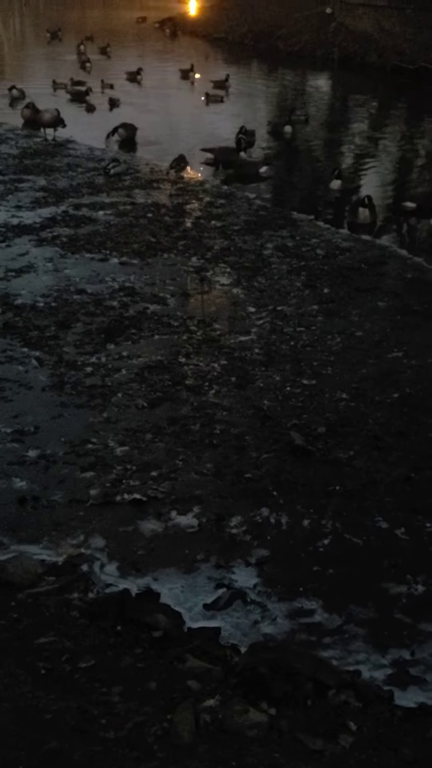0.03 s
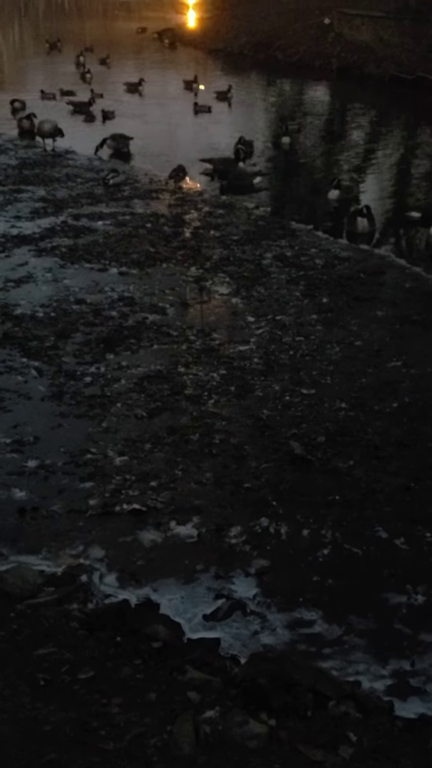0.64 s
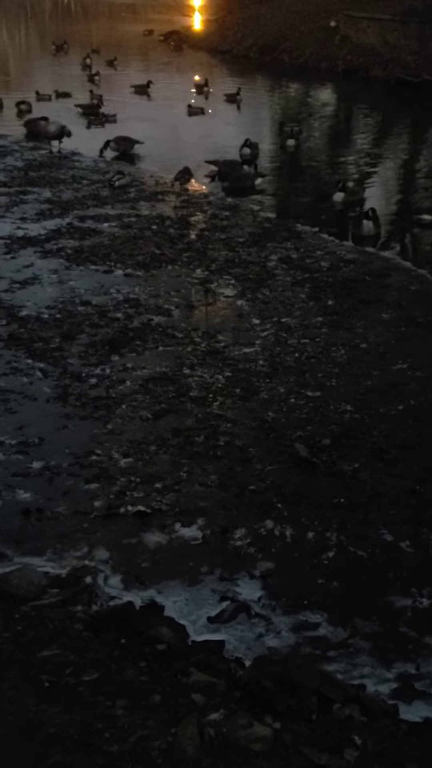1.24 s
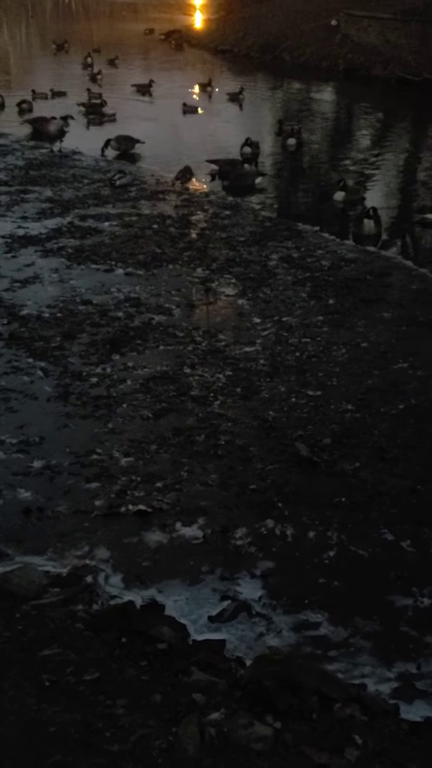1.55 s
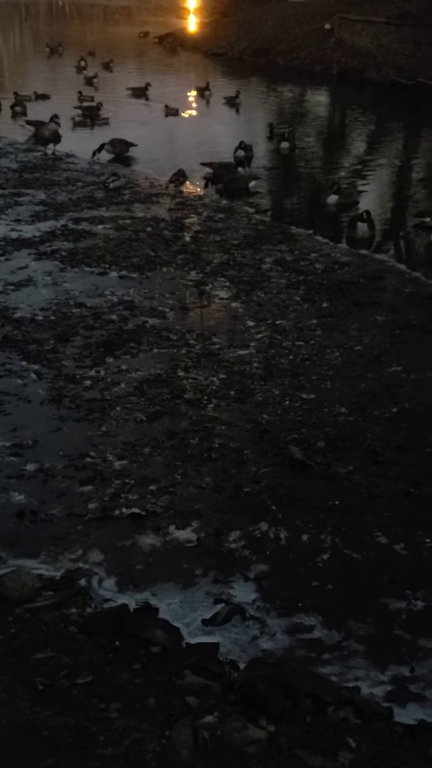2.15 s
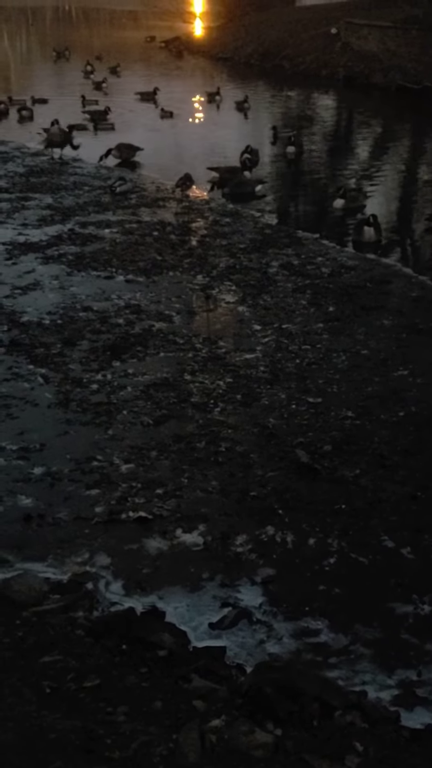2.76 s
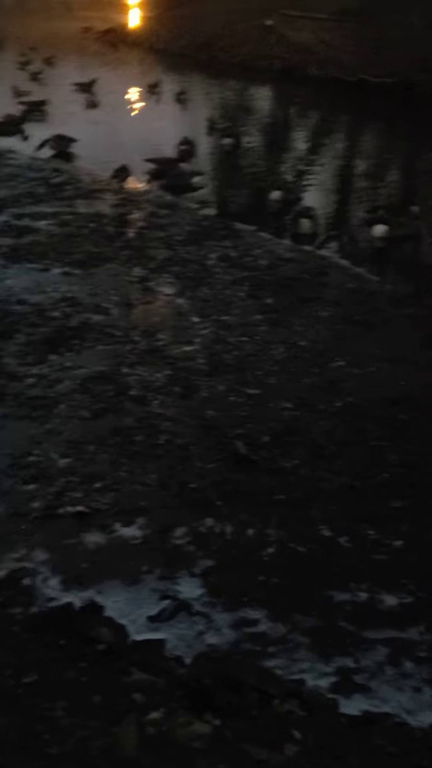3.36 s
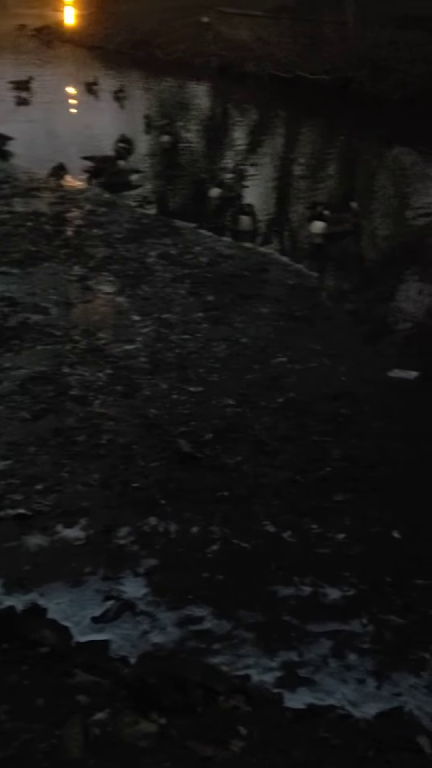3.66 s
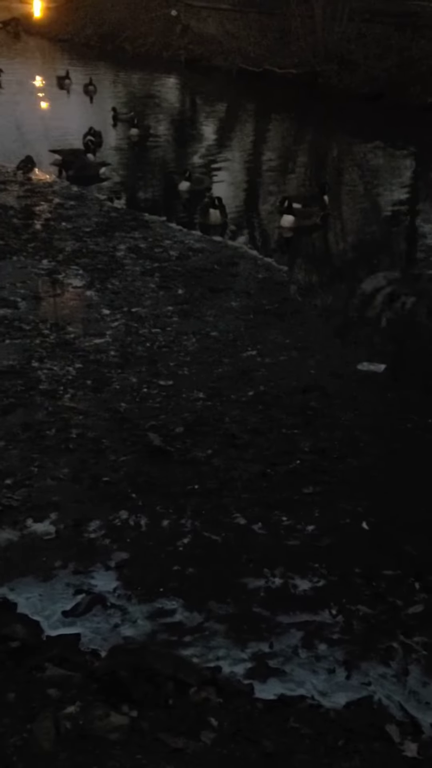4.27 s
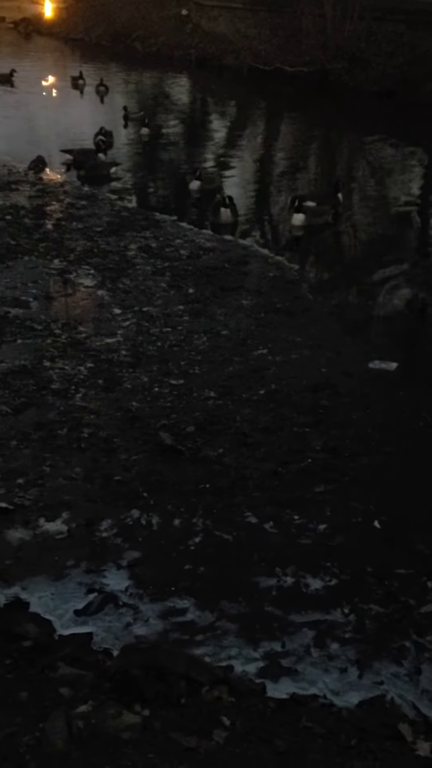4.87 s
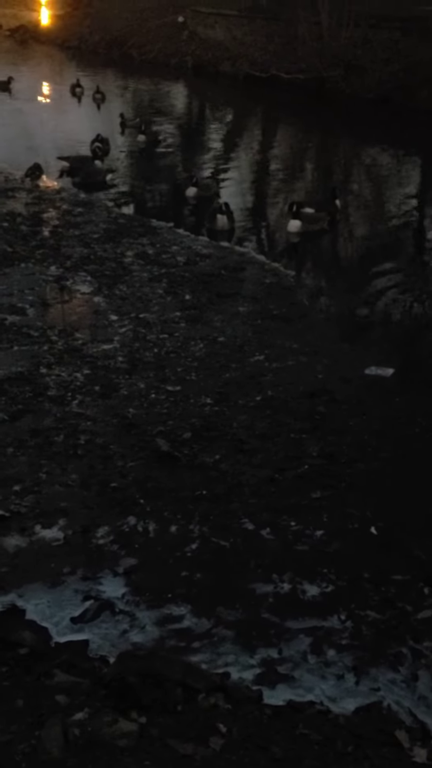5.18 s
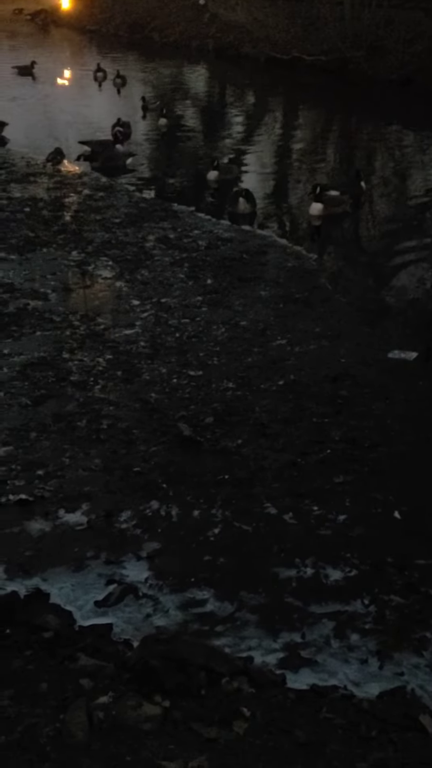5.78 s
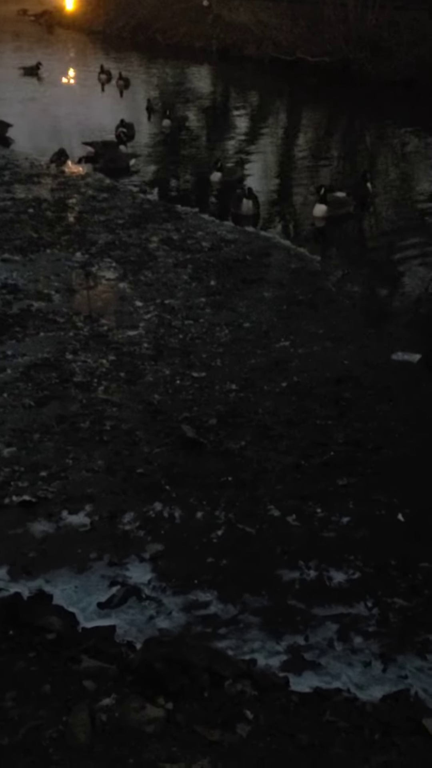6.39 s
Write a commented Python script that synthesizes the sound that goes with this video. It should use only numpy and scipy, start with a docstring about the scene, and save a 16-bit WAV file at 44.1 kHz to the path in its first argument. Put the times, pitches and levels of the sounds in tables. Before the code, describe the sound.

A low rumble of distant traffic runs throughout, heard from the shore of a half-frozen pond, with a faint whine coming and going between about 2 and 4.5 seconds. A small bird gives one faint, high chirp at the start. Waterfowl peck at ice and water in scattered short, dull taps, over a faint wet fizz of dabbling that slowly grows. Thin, distant peeps come between 1 and 4 seconds. A duck gives three soft, rattling rasps at about 1.8, 2.5 and 3.5 seconds. From 4.5 seconds to the end at about 6.5, it gives seven loud, harsh, close quacks, roughly three a second, each rising and falling in pitch, the run sinking slightly lower. These are by far the loudest sounds and echo faintly off the banks. A sleeve lightly brushes the microphone a few times, most noticeably near 3 seconds.

```python
"""Dusk at a half-frozen pond

Heard from the shore, a duck gives three soft rattling rasps, then seven loud, harsh quacks: air pulses
ringing its throat. Other waterfowl dabble and peck; farther off they peep, and a small bird chirps once.
Distant traffic rumbles with a faint whine, a sleeve brushes the microphone, the banks answer faintly."""
import sys
import numpy as np
from scipy import signal
from scipy.fft import rfft, irfft, next_fast_len
from scipy.io import wavfile
from scipy.ndimage import uniform_filter1d, map_coordinates

SR = 44100
rng = np.random.default_rng(int(sys.argv[2]) if len(sys.argv) > 2 else 0)


def transcribe(u):
    """Save the signal u as a 16-bit wav file named by the first command-line argument.

    u: samples, shape (n,) or (channels, n), limited to [-1, 1]; the rate is SR.
    q: integer samples, one column per channel.
    """
    v = np.clip(np.atleast_2d(u).T, -1, 1)
    q = np.round(v * 32767).astype(np.int16)
    wavfile.write(sys.argv[1], SR, q)


N = 287532

# Background across the microphone pair. Each row: frequency in Hz, left-right correlation.
STEREO_LIKENESS = [(60, 0.99), (130, 0.99), (290, 0.97), (640, 0.81), (1410, 0.35), (3100, 0.13),
                   (6820, 0.077), (15000, 0.18)]
# Distant roads. Each row: time in seconds, rumble level in dB, relative level of the town's wash in dB.
TRAFFIC_LEVELS = [(0, -41.5, -53.5), (.9, -42, -51.5), (1.7, -42, -52.5), (2.7, -40.5, -50.5),
                  (4.3, -42, -51), (5.6, -46, -56), (6.52, -45.5, -53)]
# Noise colours. Each row: frequency in Hz, relative spectral density in dB.
RUMBLE_SPECTRUM = [(13, -57), (22, -32.5), (29, -40), (37, -29.5), (48, 0), (64, -2), (109, -3.5),
                   (139, -9.5), (303, -24), (376, -33), (400, -28.5), (520, -28), (880, -120)]
TOWN_SPECTRUM = [(120, -11.5), (200, -5.5), (377, -9.5), (637, -14), (759, -12.5), (868, -12.5),
                 (1080, -18.5), (1850, -22.5), (5000, -50.5), (6500, -111.5), (11000, -120)]
DABBLE_SPECTRUM = [(710, -3.5), (1200, -1.5), (1370, -2.5), (1980, -4.5), (2160, -4.5), (3530, -18),
                   (4280, -12), (5090, -17), (5770, -11.5), (8160, -19.5), (9340, -36.5), (12000, -41),
                   (15600, -69), (22000, -120)]
SLEEVE_SPECTRUM = [(1500, -1), (4000, -6), (7000, -6), (9500, -10), (12500, -6), (15500, -7.5)]
BILL_HISS_SPECTRUM = [(1500, -6), (2700, -5), (3500, -7), (4300, 5), (5000, 2.5), (6100, 11), (7200, 2),
                      (8400, -8.5), (9400, -1.5), (10500, -9.5), (12500, -8.5), (15500, -15.5)]
# Dabbling, and the hiss under the sleeve. Each row: time in seconds, relative level in dB.
DABBLE_LEVELS = [(.4, -83.5), (.65, -72), (1.15, -70.5), (1.7, -81), (2.5, -68.5), (3.1, -68), (6.5, -62)]
HISS_LEVELS = [(0, -89), (2.1, -87.5), (6.5, -82.5)]
# Far birds. Each row: start and length in seconds, first, middle and last pitch in Hz, relative dB.
FAR_CALLS = [(.09, .15, 9400, 8650, 9300, -71), (.09, .15, 8300, 7600, 8400, -75),
             (1.08, .06, 950, 1080, 1350, -55), (1.93, .06, 820, 950, 1200, -57),
             (3.03, .08, 980, 1080, 1020, -57), (3.225, .025, 1300, 1750, 2200, -48),
             (3.23, .09, 1170, 1190, 1090, -56), (3.39, .13, 1160, 1280, 1090, -54.5),
             (4.08, .04, 1120, 1080, 1030, -55)]
# Sleeve strokes and spells of traffic whine. Each row: start and length in seconds, relative dB.
SLEEVE_STROKES = [(0.54, 0.96, -87), (2.294, 0.11, -77.5), (2.936, 0.19, -66.5), (3.415, 0.65, -80),
                  (5.95, 0.61, -75.5)]
WHINE_SPELLS = [(1.803, 0.87, -61.5), (3.1, .6, -64.5), (4.2, 0.34, -61)]
# Bills on ice and water. Each row: start in seconds, relative level in dB, crisp edge against that in dB.
PECKS = [(0.655, -48, -12), (.986, -40, -29), (2.17, -52, -19), (2.3495, -42, -23), (3.307, -44.5, -15),
         (3.5024, -58, 1), (3.935, -47.5, -22), (4.236, -62, 12.5), (5.06, -41.5, -13), (6.0832, -47, 1)]
# Resonances of a peck and of the duck's throat. Each row: frequency in Hz, gain in dB.
PECK_BODY = [(300, -27.5), (1400, 8.5), (3000, -2.5), (4400, -2), (6500, -7.5), (9000, -19.5),
             (15000, -27.5)]
RASPING_THROAT = [(900, -21), (1450, -11), (1750, 8.5), (2150, 9), (2500, -1.5), (2900, 4), (3600, -31),
                  (6000, -17), (9000, -53)]
QUACKING_THROAT = [(250, -58.5), (450, -47), (680, -25.5), (850, -40), (1080, -21), (1400, -19.5),
                   (1650, -15.5), (1900, -1.5), (2120, -3), (2400, -16), (2900, -27), (3600, -41),
                   (6000, -54), (12000, -64)]
# The duck's rasps. Each row: start and length in seconds, relative level at the end in dB.
RASP_CALLS = [(1.763, .21, -58), (2.536, 0.2, -51.5), (3.507, 0.19, -51)]
# The duck at the microphone's two ports. Each row: frequency in Hz, left over right in dB.
PORT_BALANCE = [(500, 0), (800, -0.5), (1200, 6), (1700, -9), (2150, -8), (2700, -3.5), (4200, 1),
                (15000, -2)]
# Its earlier arrival on the left. Each row: frequency in Hz, lead in seconds.
LEFT_LEAD = [(860, 0.00026), (1400, 0.00064), (2600, 0.000553), (6000, 0.000504)]
# The quacks. Each row: start, length and time to the top of the pitch arch in seconds; first, top and
# last pitch in Hz; flatness of the arch; relative level and fade after the top in dB; clearness at
# the top and weakening of every second pulse, both 0-1; throat resonance in Hz.
QUACK_CALLS = [(4.48, 0.19, 0.11, 392.5, 462.8, 399.2, 2.71, -28.5, 1, 0.3, 0.78, 1927),
               (4.768, 0.22, 0.095, 348.1, 470.8, 314.1, 2.37, -26.5, 7.5, 0.67, 0.42, 1843),
               (5.095, .223, .081, 320.8, 457.5, 301.8, 1.65, -26.5, 6.5, 0.64, 0, 1837),
               (5.436, 0.22, .08, 287.2, 445.3, 321.5, 1.4, -28.5, 6, 0.48, 0, 1848),
               (5.784, .212, .085, 317, 420.3, 312, 1.35, -29.5, 4.5, 0.02, 0, 1848),
               (6.125, 0.18, 0.1, 330.9, 393.7, 295.1, 2.46, -29.5, 3, .1, 0.58, 1846),
               (6.437, 0.22, 0.098, 254.2, 388, 329.4, 2.58, -29, 1, 0.5, 0.9, 1810)]
# How strongly a quack's clean low harmonics radiate. Each row: frequency in Hz, gain in dB.
LOW_HARMONICS = [(300, -51.5), (390, -43.5), (460, -41), (600, -42), (780, -41.5), (930, -40.5),
                 (1150, -48), (1400, -53.5)]
# Echo from the wooded banks. Each row: frequency in Hz, time to fall 60 dB in seconds.
BANK_DECAY = [(300, 0.53), (2000, 0.52), (10000, 1)]


def amp(db):
    """Decibels to gain."""
    return 10 ** (np.asarray(db) / 20)


def unit(x):
    """Scale to rms 1."""
    return x / np.sqrt(np.mean(x ** 2) + 1e-20)


def along(points, hz):
    """Read (Hz, value) points on a log frequency axis."""
    f, v = np.transpose(points)
    return np.interp(np.log(hz + 1), np.log(f + 1), v)


def curves(rows):
    """One value per sample for each column after the time."""
    s, *cols = np.transpose(rows)
    return [np.interp(np.arange(N) / SR, s, c) for c in cols]


def wobble(rate):
    """A smooth random curve, rate knots a second."""
    return map_coordinates(rng.standard_normal(int(N * rate / SR) + 4), [np.arange(N) * rate / SR])


def gate(t, length_s, attack_s, release_s):
    """Rise from t = 0, hold until length_s, then fall to silence."""
    return np.clip(t / attack_s, 0, 1) * np.clip(1 - (t - length_s) / release_s, 0, 1)


def filtered(x, response):
    """x through a complex frequency response."""
    m = next_fast_len(N + SR // 2)
    return irfft(rfft(x, m) * response(np.fft.rfftfreq(m, 1 / SR)), m)[..., :N]


def ring(x, points, size=2048):
    """x through a minimum-phase body with this (Hz, dB) response."""
    cepstrum = irfft(np.log(amp(along(points, np.fft.rfftfreq(size, 1 / SR)))))
    cepstrum[1:size // 2] *= 2
    cepstrum[size // 2 + 1:] = 0
    impulse = irfft(np.exp(rfft(cepstrum)))
    return np.apply_along_axis(signal.oaconvolve, -1, x, impulse)[..., :N]


def steady(x, size=1100):
    """Hold the short-term rms at 1."""
    return x / np.sqrt(np.abs(uniform_filter1d(uniform_filter1d(x ** 2, size), size)) + 1e-12)


def pulses(at, sizes):
    """Impulses at fractional sample positions."""
    at = np.clip(at, 0, N - 2)
    whole = at.astype(int)
    part = at - whole
    return np.bincount(whole, sizes * (1 - part), N) + np.bincount(whole + 1, sizes * part, N)


def cycles(rate_hz):
    """Sample positions at which each new cycle starts."""
    turns = np.cumsum(rate_hz) / SR
    return np.interp(np.arange(1, int(turns[-1])), turns, np.arange(N))


def rush(spectrum):
    """Stereo noise of rms 1, centred in the bass and wide in the treble."""
    def mid_and_side(hz):
        angle = np.arccos(np.clip(along(STEREO_LIKENESS, hz), -1, 1)) / 2
        return amp(along(spectrum, hz)) * [np.cos(angle), np.sin(angle)]
    mid, side = filtered(rng.standard_normal((2, N)), mid_and_side)
    return unit(np.array([mid + side, mid - side]))


def traffic():
    """Roads in the distance: a low rumble, the town's soft wash, a wavering whine that comes and goes."""
    rumble_db, town_db = curves(TRAFFIC_LEVELS)
    t = np.arange(N) / SR
    spells = sum(amp(db) * gate(t - s, length, .051, .051) for s, length, db in WHINE_SPELLS)
    whine_hz = 1338 * (1 + .0034 * wobble(25.5))
    whine = np.sin(2 * np.pi * np.cumsum(whine_hz) / SR) * spells * amp(.57 * wobble(14))
    rumble = amp(rumble_db + .2 * wobble(5.14)) * rush(RUMBLE_SPECTRUM)
    town = amp(town_db + 1 + .24 * wobble(5.4)) * rush(TOWN_SPECTRUM)
    return rumble + town + whine


def droplets(count):
    """Tiny bubbles at random moments, each ringing for a few cycles; rms 1."""
    when, pitch, size, pan = rng.random((count, 4)).T[..., None]
    t = np.arange(160) / SR
    hz = 3200 * 2.5 ** pitch
    age = t * hz / 1.8
    bubbles = amp(14 * size ** 5) * age * np.exp(-age) * np.sin(2 * np.pi * hz * t)
    where = ((when * N).astype(int) + np.arange(len(t))).ravel()
    sides = [np.bincount(where, (bubbles * np.sqrt(share)).ravel(), N)[:N] for share in (pan, 1 - pan)]
    return unit(np.array(sides))


def dabbling():
    """Birds dabble nearby at the edge of the ice: a fine, wet fizz of noise and bubbles."""
    fizz = unit(ring(droplets(count=2000), DABBLE_SPECTRUM))
    water = unit(rush(DABBLE_SPECTRUM) + .25 * fizz) * amp(1.1 * wobble(22))
    return amp(curves(DABBLE_LEVELS)[0] + 11.5) * water


def peeps():
    """Farther off, a high chirp and lower peeps: thin, fluttering whistles bent through three pitches."""
    out = np.zeros(N)
    for s, length, start_hz, middle_hz, end_hz, db in FAR_CALLS:
        u = np.linspace(0, 1, int(length * SR))
        waver = 1 + .016 * wobble(500)[:len(u)]
        flutter = amp(4 * wobble(200)[:len(u)])
        hz = np.polyval(np.polyfit([0, .5, 1], [start_hz, middle_hz, end_hz], 2), u) * waver
        whistle = np.sin(2 * np.pi * np.cumsum(hz) / SR)
        out[int(s * SR):][:len(u)] += amp(db) * unit(flutter * np.sin(np.pi * u) * whistle)
    return out


def sleeve():
    """Cloth rubs right at the microphone in soft strokes, over a faint hiss."""
    attack_s, decay_db_per_s = .071, 47.5
    t = np.arange(N) / SR
    strokes = np.zeros(N)
    for s, length, db in SLEEVE_STROKES:
        fade_db = decay_db_per_s * np.maximum(t - s - length, 0)
        strokes += amp(db - fade_db) * np.clip((t - s) / attack_s, 0, 1)
    hiss = amp(curves(HISS_LEVELS)[0])
    return rush(SLEEVE_SPECTRUM) * amp(14 + 1.5 * wobble(120)) * np.hypot(strokes, hiss)


def pecks():
    """Bills strike ice and water: a dull crackle with a shorter, crisp edge."""
    dull, crisp = np.zeros((2, 2, N))
    t = np.arange(SR // 20) / SR
    for s, db, bright_db in PECKS:
        burst = amp(db - 60 * t / .076) * rng.standard_normal((2, len(t)))
        dull[:, int(s * SR):][:, :len(t)] += burst
        crisp[:, int(s * SR):][:, :len(t)] += burst * amp(bright_db - 60 * t / .012)
    return amp(1) * ring(dull, PECK_BODY) + amp(1.5) * crisp


def air_puffs(beats, decay_s):
    """The airflow after each pulse: a short puff that dies away."""
    return signal.lfilter([1], [1, -np.exp(-1 / (decay_s * SR))], beats)


def from_left(x):
    """A call reaches the microphone's left port first, and each port colours it differently."""
    sides = np.array([[.5], [-.5]])
    return filtered(x, lambda hz: amp(sides * along(PORT_BALANCE, hz))
                    * np.exp(2j * np.pi * hz * along(LEFT_LEAD, hz) * sides))


def rasps():
    """The duck rattles softly: slow throat pulses with puffs of air, growing louder, then breaking off."""
    rate_hz, swell_db = 101, 12
    at = cycles(rate_hz * (1 + .035 * wobble(25)))
    beats = pulses(at, amp(1.9 * rng.standard_normal(N)[at.astype(int)]))
    air = air_puffs(beats, decay_s=.003) * rng.standard_normal(N)
    voice = .5 * unit(ring(beats, RASPING_THROAT)) + unit(ring(air, RASPING_THROAT))
    effort = np.zeros(N)
    for s, length, db in RASP_CALLS:
        t = np.arange(N) / SR - s
        level_db = db - swell_db * np.clip(1 - t / length, 0, 1)
        effort += amp(level_db) * gate(t, length, attack_s=.032, release_s=.095)
    return from_left(amp(6) * effort * steady(voice))


def quack_controls():
    """Each quack arches in pitch: it starts ragged, swells, may ring clear at the top, then fades."""
    swell_s, swell_db, release_s = .039, 9, .0052
    ragged_s, onset_rough, onset_split, body_rough = .055, .67, .71, .45
    clear_s, clear_db = .023, 2.5
    bill_opens_s, bill_rise_hz = .071, 133
    controls = np.zeros((5, N))
    controls[0] = QUACK_CALLS[0][3]  # pitch rests here until the first quack
    for (s, length, top_s, start_hz, top_hz, end_hz, flatness,
         db, fade_db, clearness, pairing, throat_hz) in QUACK_CALLS:
        first = int(s * SR)
        t = np.arange(N - first) / SR
        rise, fall = np.clip(1 - t / top_s, 0, 1), np.clip((t - top_s) / (length - top_s), 0, 1)
        pitch_hz = top_hz - (top_hz - start_hz) * rise ** flatness - (top_hz - end_hz) * fall ** flatness
        ragged = np.exp(-(t / ragged_s) ** 2)
        clear = clearness * np.exp(-((t - top_s) / clear_s) ** 2)
        rough = (body_rough + (onset_rough - body_rough) * ragged) * (1 - clear)
        split = (pairing + (onset_split - pairing) * ragged) * (1 - clear)
        level_db = db - swell_db * np.clip(1 - t / swell_s, 0, 1) + clear_db * clear
        level_db -= fade_db * np.sin(fall * np.pi / 2)
        level_db -= .5 * np.exp(-((t - length) / .011) ** 2)  # a slight dip as it stops
        effort = amp(level_db) * gate(t, length - release_s, .0045, release_s)
        resonance_hz = throat_hz - bill_rise_hz * np.exp(-t / bill_opens_s)
        controls[:, first:] = pitch_hz, rough, split, resonance_hz, effort
    return controls


def throat(x, resonance_hz):
    """The throat blends from a lower resonance to a higher one as the bill opens."""
    shut_hz, open_hz = 1750, 1990
    opening = np.clip((resonance_hz - shut_hz) / (open_hz - shut_hz), 0, 1)
    tuned = lambda hz: ring(x, np.array(QUACKING_THROAT) * [2 * hz / (shut_hz + open_hz), 1])
    return (1 - opening) * tuned(shut_hz) + opening * tuned(open_hz)


def quacks():
    """The duck, loud and near: syrinx pulses ring its throat, pairing up and turning ragged."""
    jitter_s, scatter_db, flutter_db = .00012, 3.5, 1.2  # at full roughness
    pitch_hz, rough, split, resonance_hz, effort = quack_controls()
    effort = effort * amp(flutter_db * rough * wobble(70))
    pitch_hz = pitch_hz * (1 + .013 * rough * wobble(150))
    at = cycles(pitch_hz)
    now = at.astype(int)
    late, strong = rng.standard_normal((len(at), 2)).T
    sizes = (1 - split[now] * (np.arange(len(at)) % 2)) * amp(scatter_db * rough[now] * strong)
    beats = pulses(at + SR * jitter_s * rough[now] * late, sizes)
    puffs = unit(air_puffs(beats, decay_s=.0015))
    air = throat(puffs * rng.standard_normal(N), resonance_hz)
    voice = steady(steady(throat(beats, resonance_hz)) + .9 * rough * steady(air), size=500)
    flow = np.abs(effort / amp(-17)) ** .5
    phase = 2 * np.pi * np.cumsum(pitch_hz) / SR
    # paired pulses add a line halfway between the first two harmonics
    lines = [(1, 1), (1.5, .7 * split ** 2), (2, 1), (3, 1)]
    hum = sum(share * amp(along(LOW_HARMONICS, k * pitch_hz)) * np.sin(k * phase) for k, share in lines)
    hum = np.sqrt(2) * hum * flow * amp(1.06 * wobble(70))
    # air hisses through the bill, most at the top of the pitch arch
    hiss = unit(ring(puffs * rng.standard_normal((2, N)), BILL_HISS_SPECTRUM))
    hiss *= flow * (pitch_hz / 440) ** 2.2
    return from_left(amp(2) * effort * voice + hum) + amp(-46) * hiss


def banks(x):
    """Ice and shore scatter a sound at once; the wooded banks add a faint tail."""
    hz, t, spectra = signal.stft(rng.standard_normal((2, SR * 3 // 4)), SR, nperseg=256)
    decay = amp(-60 * t / along(BANK_DECAY, hz)[:, None])
    tail = signal.istft(spectra * decay, SR, nperseg=256)[1]
    t = np.arange(tail.shape[1]) / SR
    early = rng.standard_normal(tail.shape) * amp(-60 * t / .025) * (t > .001)
    echo = amp(-11) * early / np.linalg.norm(early[0]) + amp(-9.5) * tail / np.linalg.norm(tail[0])
    return signal.fftconvolve(x, echo, axes=1)[:, :N]


def scene():
    """The pond from the shore, over the evening's background; the far birds carry more echo."""
    near = quacks() + rasps() + pecks()
    far = peeps()
    return near + amp(-3) * far + banks(near + amp(2) * far) + traffic() + dabbling() + sleeve()


def record(dry):
    """The camera's microphone channel keeps nothing above its band limit."""
    top_hz = 15750
    return filtered(dry, lambda hz: hz < top_hz)


dry = scene()
out = record(dry)
transcribe(out)
```